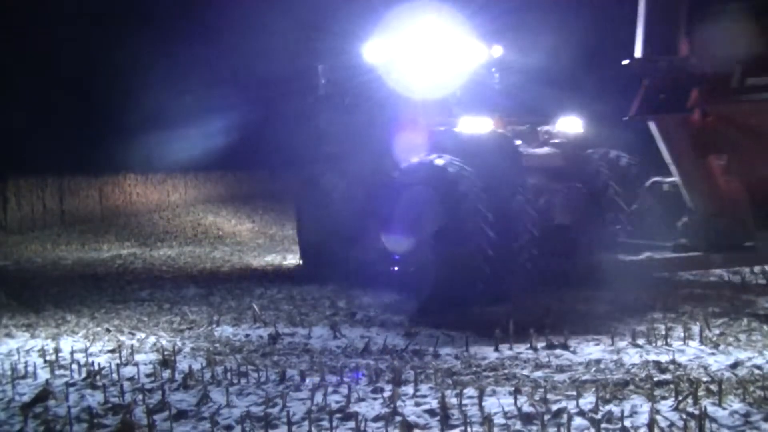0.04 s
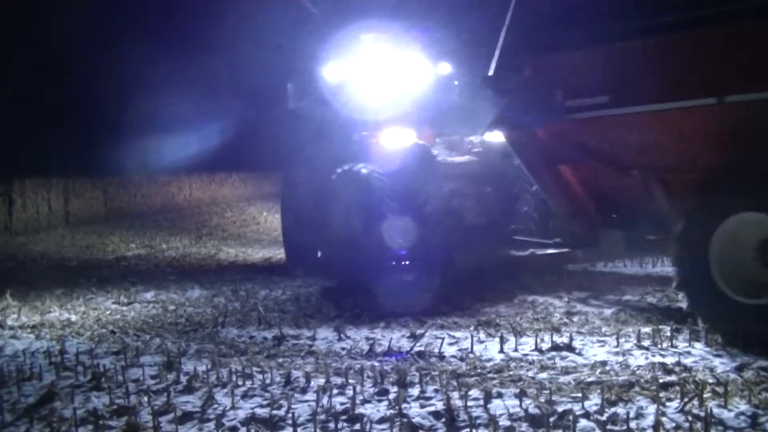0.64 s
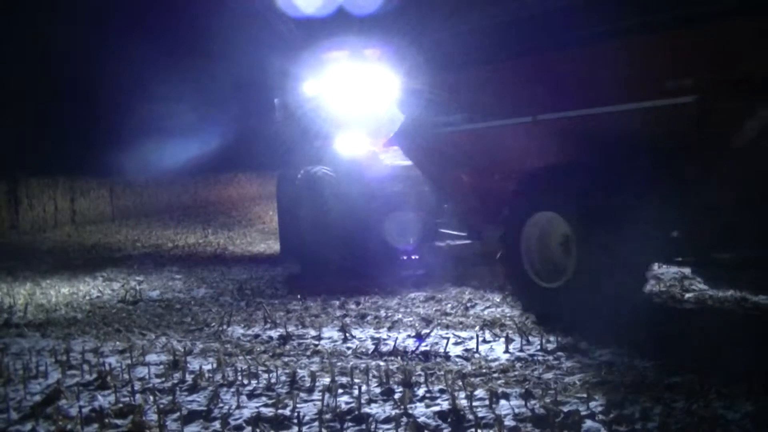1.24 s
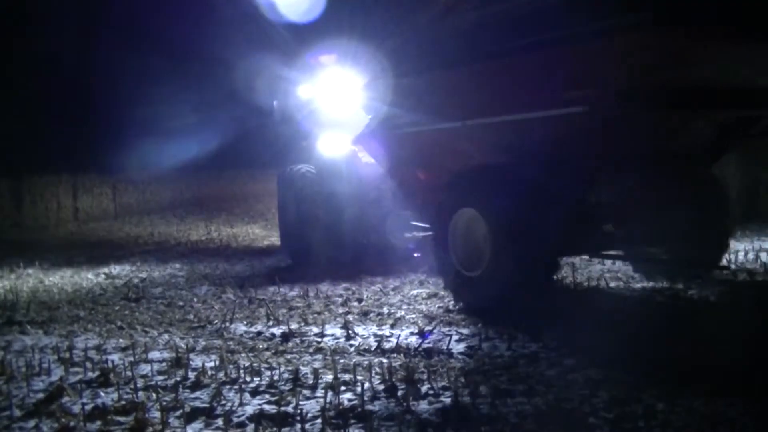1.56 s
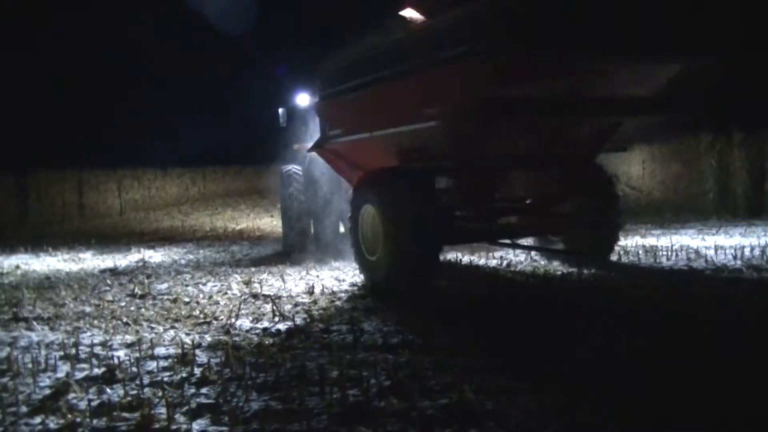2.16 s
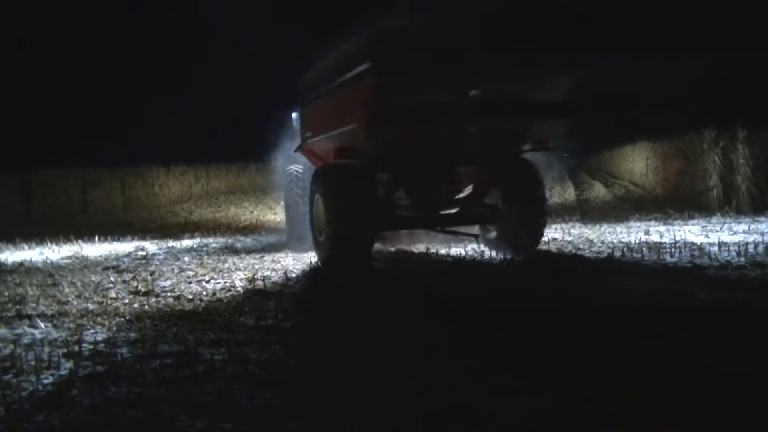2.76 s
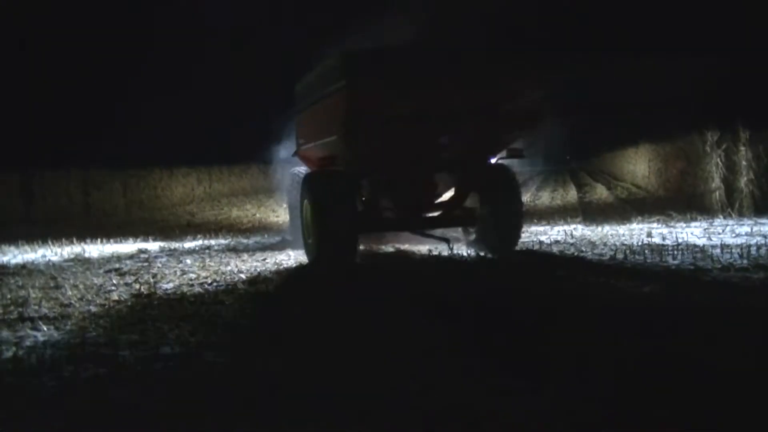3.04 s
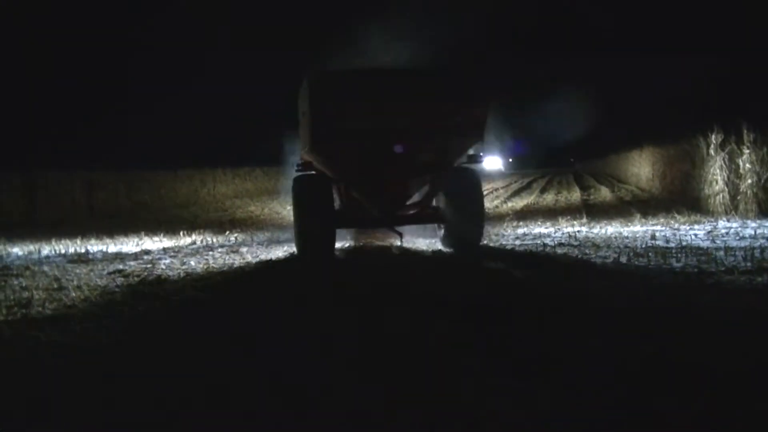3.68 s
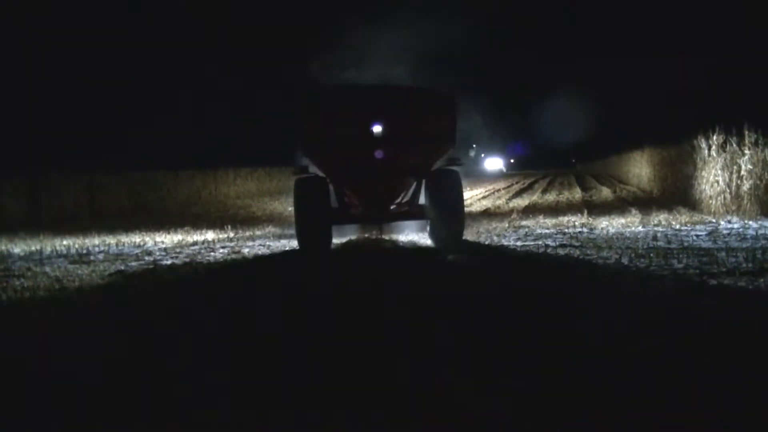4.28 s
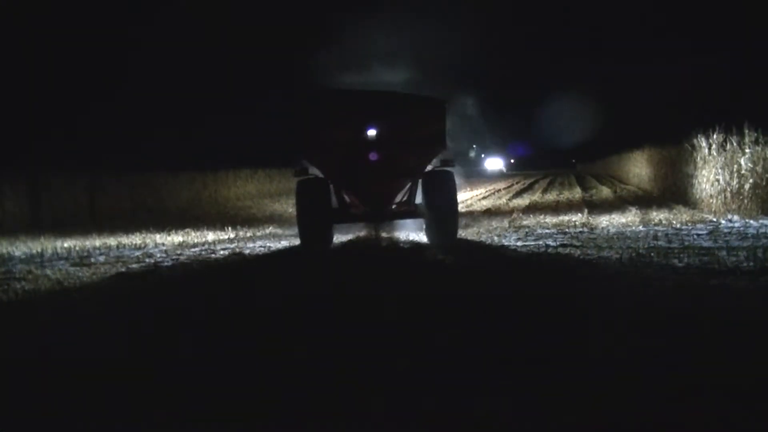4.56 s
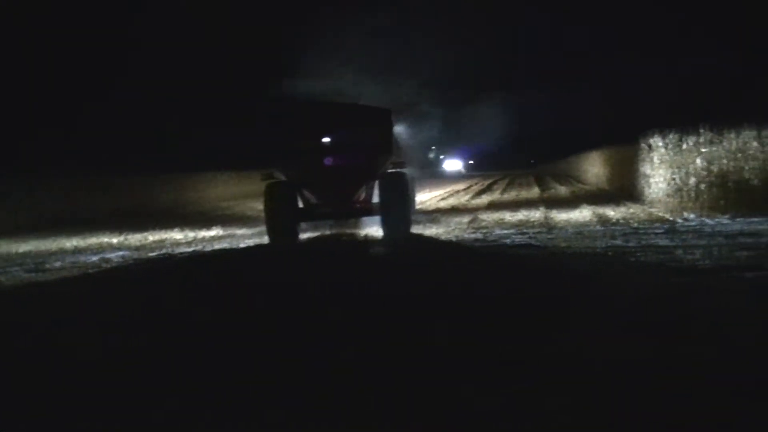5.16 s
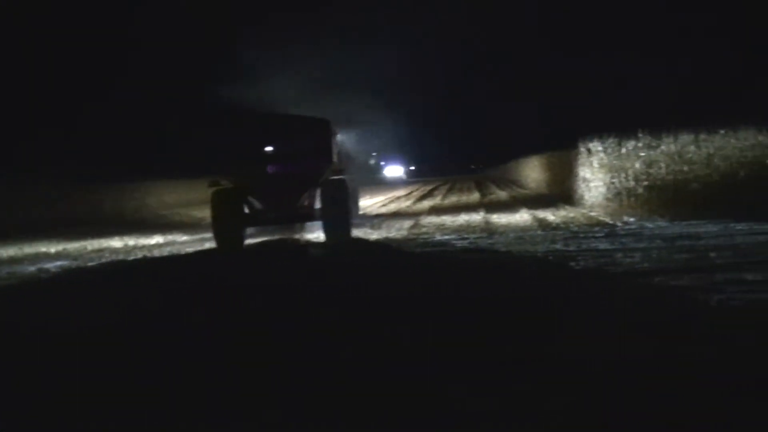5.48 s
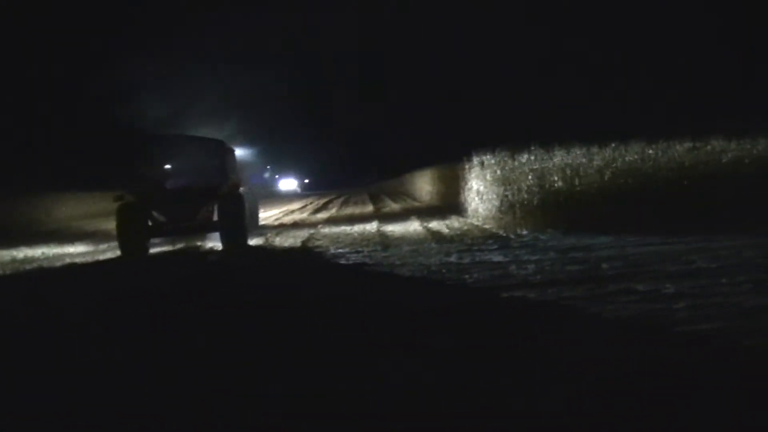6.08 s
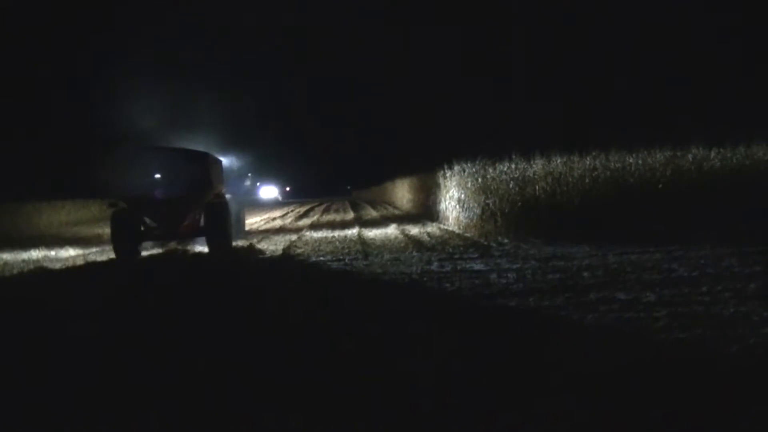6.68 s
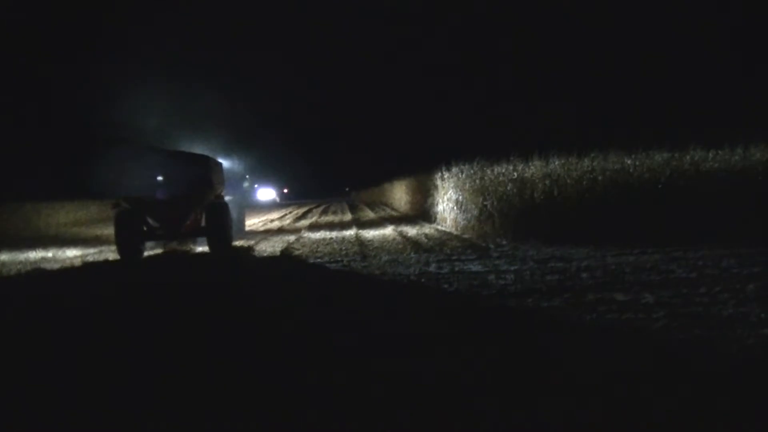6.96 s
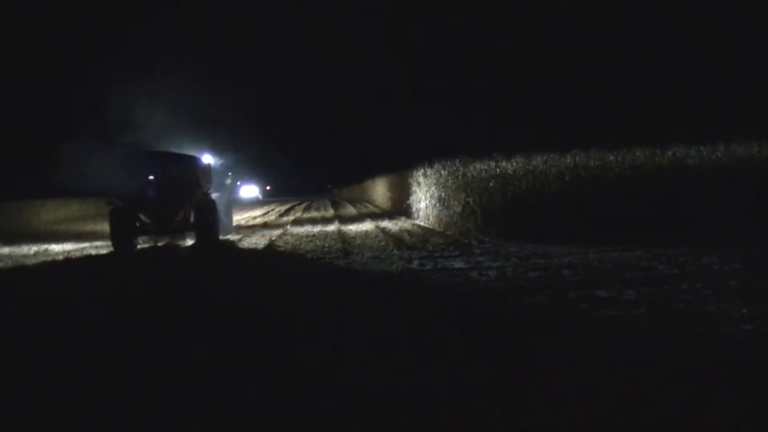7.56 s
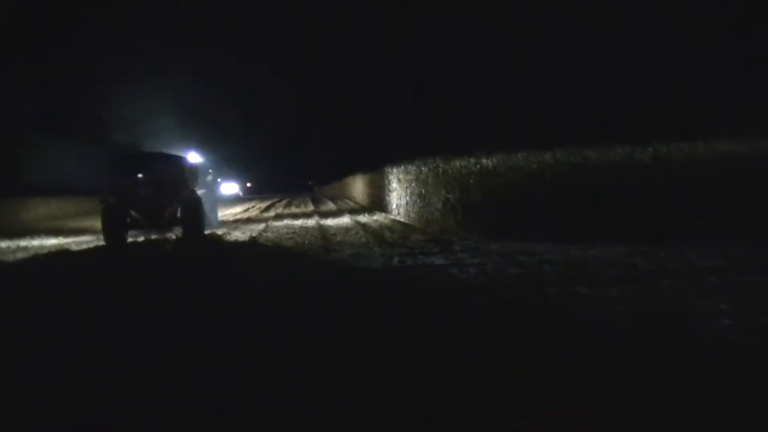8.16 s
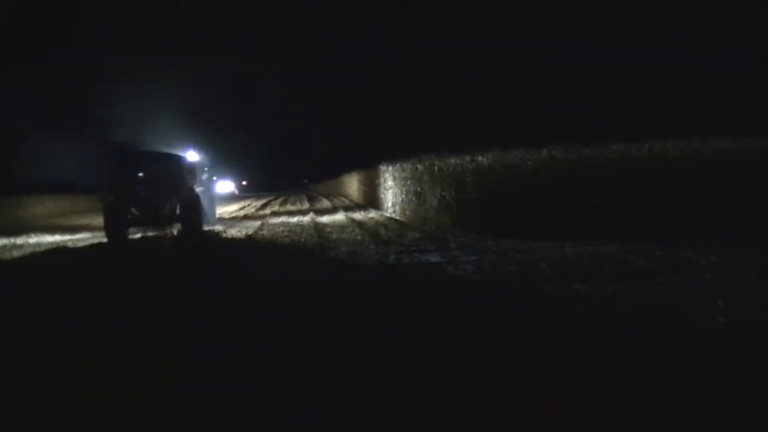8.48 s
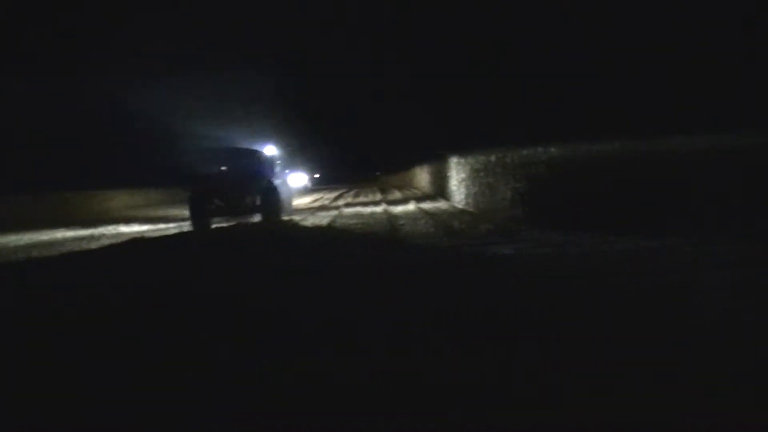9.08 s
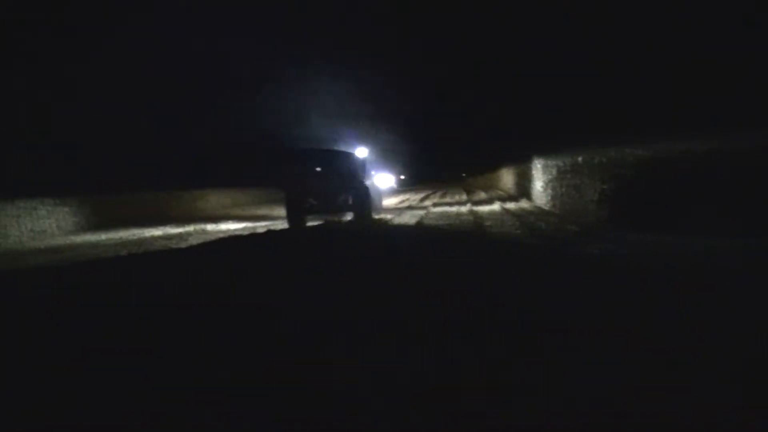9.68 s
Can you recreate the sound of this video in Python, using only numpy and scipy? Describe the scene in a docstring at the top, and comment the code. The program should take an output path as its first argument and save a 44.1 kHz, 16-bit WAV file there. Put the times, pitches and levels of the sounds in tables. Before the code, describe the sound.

A tractor tows a rattling cart close by over dry, crackling corn stubble, then fades away across an open field.

```python
"""A tractor tows a grain cart past, a few metres away, crushing the maize stubble of a frozen field.
Dry stalks crackle and snap under the wheels, the tyres rumble, and ruts rattle the cart's steel box.
The diesel pulses and whines, then fades as it drives off; a loose hitch part knocks once.
Close by, a small metal part pings and cloth brushes twice. A far harvester hums under a soft hiss."""
import sys
import numpy as np
from scipy import signal
from scipy.fft import rfft, irfft, next_fast_len
from scipy.io import wavfile
from scipy.ndimage import uniform_filter1d

SR = 44100
rng = np.random.default_rng(int(sys.argv[2]) if len(sys.argv) > 2 else 0)


def wav_out(sig):
    """Save sig, one row per channel (or a flat mono array), as 16-bit PCM at SR to the path in sys.argv[1]."""
    wavfile.write(sys.argv[1], SR, np.round(np.clip(np.atleast_2d(sig).T, -1, 1) * 32767).astype(np.int16))


N = 437913
T = np.arange(N) / SR
FREQS = np.arange(N // 2 + 1) * SR / N

# In these tables, "decay" is the time a sound takes to fall by 60 dB.
# how wide the stereo sound is: (frequency [Hz], side minus middle [dB])
STEREO_WIDTH = [(60, -19), (250, -10.5), (600, -19.5), (1800, -20.5), (2800, -11.5), (3800, -18.5),
                (4900, -17.5), (5700, -3), (6800, -4.5), (8000, -10), (10500, -1.5), (15000, -8.5)]
# how the microphone's two openings differ in tone: (frequency [Hz], left minus right [dB])
MIC_BALANCE = [(60, -2), (700, -3), (1400, -0.9), (3000, 0.5), (3350, -5.5), (4800, -2), (5350, -5),
               (6050, 5), (6850, -2), (7400, 4), (8600, -2), (9500, -7), (11000, -2.5), (15000, 1)]
# how far the left opening runs ahead: (frequency [Hz], phase lead [radians])
MIC_LEAD = [(2000, 0), (3100, -.3), (4250, .35), (5100, 0), (5600, .9), (6400, -.3), (8200, -.4),
            (9000, -1), (10100, .5), (12000, .3), (13000, 2), (15000, 2.2)]
# the tone of the background hiss: (frequency [Hz], relative level [dB])
HISS_TONE = [(120, -1), (200, -2), (300, -4), (450, -2), (600, 0), (1200, 0), (1800, -1.5), (2300, -3),
             (3000, -2), (3550, 2), (4100, -3), (4800, 5), (5700, -4), (6850, -10.5), (7950, -17),
             (9500, -14), (11000, -19.5), (15500, -21.5)]
# a thin, high sizzle: (time [s], level [dB])
SIZZLE_LEVELS = [(0, -63), (5.9, -52), (9.93, -59.5)]
# the harvester's hum at 1, 2, 3... times its shaft speed: (level [dB])
HUM_LEVELS = [-77, -66, -68, -74, -74.5, -75.5]
# cloth brushes past: (middle time [s], level [dB], half length [s])
CLOTH_BRUSHES = [(8.797, -34.5, .02), (8.85, -49, 0.036), (9.845, -46, 0.0033), (9.894, -34, 0.025)]
# the tone of the cloth: (frequency [Hz], relative level [dB])
CLOTH_TONE = [(300, -30), (1000, -10), (2500, -13), (3500, -2), (5000, 4), (6800, -5), (8000, -1),
              (10000, -20), (15000, -32)]
# the small metal part's notes: (frequency [Hz], relative level [dB], decay [s])
METAL_NOTES = [(13300, -5, .08), (14430, 0, 0.11), (14460, -3, .08), (14760, -5, .04), (15276, -4, .09)]
# the small metal part is touched: (time [s], level [dB], decay [s])
METAL_TOUCHES = [(.605, -39, 0.026), (.773, -17, .05), (.8, -29, 0.48), (.945, -31, .03), (8.72, -53, .4),
                 (9.875, -48, .3)]
# the hitch part's notes: (frequency [Hz], relative level [dB], decay [s])
HITCH_NOTES = [(1430, 9, 0.05), (1570, 0, .04), (1780, -2, .03), (2100, -2, .025), (2439, 4, .045),
               (3666, -14, .03)]
# the tone of the engine block: (frequency [Hz], relative level [dB])
BLOCK_TONE = [(140, -48), (230, -11), (260, -16), (332, -14), (439, -5.5), (502, -2.5), (709, -8),
              (896, -3.5), (1270, -4.5), (1380, -6.5), (1830, -1.5), (2040, -8.5), (2420, -8.5),
              (3300, -5.5), (4290, -1.5), (7260, -120)]
# where the exhaust pipe rings: (frequency [Hz], width [Hz], relative level [dB])
PIPE_PEAKS = [(563, 69, -4), (621, 17, 0), (885, 350, -6.5), (1230, 290, -7), (2800, 39, -5)]
# gears and fan whine: (starting frequency [Hz], relative level [dB])
WHINE_NOTES = [(288, -63), (337, -58.5), (511, -53.5), (630, -52), (1421, -50.5), (1830, -53),
               (2589, -53.5)]
# the tone of tyres on hard ground: (frequency [Hz], relative level [dB])
RUMBLE_TONE = [(20, -36), (45, -22), (70, -7), (120, 2), (170, 4), (210, -7.5), (260, -1.5), (350, -3.5),
               (600, 2), (1500, -55)]
# the heavy wheels drop into hollows: (middle time [s], level [dB], half length [s])
WHEEL_THUMPS = [(.5, -57, 0.045), (.94, -50, 0.043), (1.18, -51, .11), (1.38, -48, .04), (2.23, -54, .05),
                (2.77, -52.5, .09), (3.15, -54.5, .17), (3.8, -58, 0.35), (4.75, -58, .05),
                (5.28, -55, .04), (6.55, -60, .04)]
# the cart clatters: (time [s], level [dB], rise [s], decay [s]). The quick rows are jolts over ruts; # the row
# at 3.9 s is a soft, slow swell of mid-range sound that lingers as the tractor draws away.
CART_CLATTER = [(.424, -26.5, 0.015, .5), (0.695, -22, .001, 0.78), (.91, -31.5, .025, 0.35),
                (1.08, -39.5, 0.025, 1.5), (1.455, -31.5, 0.028, 0.3), (2.19, -32.5, .035, 0.2),
                (2.628, -32, 0.036, 0.49), (2.785, -36.5, 0.021, 0.29), (3.049, -32.5, 0.043, 0.58),
                (3.2, -37, 0.026, 0.5), (3.305, -37.5, 0.018, 0.44), (3.4, -39.5, .015, 0.55),
                (3.51, -41, 0.022, 0.29), (3.62, -38.5, 0.014, 0.6), (3.751, -38, 0.0085, 0.37),
                (3.9, -46.5, 0.12, 1.9), (4.73, -43, 0.018, .33), (5.265, -47.5, .01, .4),
                (6.7, -50, 0.014, .25), (9.11, -48, .009, .1)]
# the tone of the chattering steel box: (frequency [Hz], relative level [dB])
BOX_TONE = [(90, -29), (200, -23), (300, -20), (430, -8), (620, 0), (740, -1), (1050, -2), (1450, 2.5),
            (1900, 1), (2500, 0), (3500, 5), (6000, -13), (12000, -50)]
# where the box's panels ring: (frequency [Hz], width [Hz], relative level [dB])
PANEL_PEAKS = [(565, 76, -1), (996, 95, 2), (1236, 110, -1), (1700, 140, -4), (2200, 50, -11)]
# where the axle rings: (frequency [Hz], width [Hz], relative level [dB])
AXLE_PEAKS = [(241, 14, 7), (394, 80, -1)]
# the tone of a dry stalk: (frequency [Hz], relative level [dB])
STALK_TONE = [(1350, -24), (2300, -23), (2790, -19.5), (4320, 1), (4790, 2.5), (5030, 1.5), (5710, -14.5),
              (6240, -6), (6810, -21), (7380, -14.5), (9010, -17.5), (10200, -29.5), (11800, -28.5),
              (13100, -31), (15500, -33)]
# single stalks snap: (time [s], base level [dB], splinter gain [dB], treble gain [dB]); # the row at 0.6955 s
# is the sharp crack that opens the cart's jolt at that moment
STALK_SNAPS = [(0.0699, -13.5, -13, 7.5), (.222, -20.5, -10, 6), (.261, -14, -10, 4.5), (.3105, -17, -8, 3),
               (.365, -21.5, -6.5, 10.5), (.654, -16, -8, 5), (.6955, -15.5, -7, -3), (.707, -12, -3.5, -2),
               (.888, -14.5, -7.5, -8), (.9796, -3, -17, -2), (1.038, -12, -10, -9),
               (1.166, -10.5, -6.5, -2), (4.361, -22, -10, -10), (4.9, -26, -2, -4),
               (5.0201, -20, -20, -7.5), (5.151, -24.5, -8, 0), (5.3, -31, -5, -4), (5.45, -31, -8, 0),
               (5.861, -26, -15, 12.5), (6.012, -31.5, -9, 8), (6.172, -28, -9, 12.5), (6.33, -34, -10, 7),
               (6.549, -27, -10.5, -2), (6.675, -35, -8, 6), (6.967, -31.5, -4, -5)]
# the wheels flatten thick stubble: (middle time [s], level [dB], half length [s])
THICK_PATCHES = [(.52, -35, 0.022), (1.1, -26, 0.021), (1.27, -36, 0.033), (1.48, -21, 0.1),
                 (1.78, -20.5, 0.24), (2.28, -22, 0.12), (3.45, -32, 0.11), (3.96, -32.5, 0.066),
                 (4.5, -45, 0.033)]

SPEED_M_S, NEAREST_M = 4.25, 5.86
TRACTOR_PASSES_S, CART_PASSES_S = 0.99, 1.15
TURN_MIDDLE_S, TURN_LENGTH_S = 2.3, 0.42  # the cart turns its back to the listener


def undb(db):
    """Turn decibels into a gain to multiply by."""
    return 10 ** (np.asarray(db) / 20)


def gains(points):
    """Gain at every frequency, drawn through (frequency [Hz], level [dB]) points."""
    hz, db = np.transpose(points)
    return undb(np.interp(np.log(FREQS + 1), np.log(hz), db))


def resonances(peaks):
    """Gain at every frequency for something that rings at (frequency [Hz], width [Hz], level [dB])."""
    return np.sqrt(sum(undb(db) ** 2 / (1 + ((FREQS ** 2 - hz ** 2) / ((FREQS + 1) * width)) ** 2)
                       for hz, width, db in peaks))


def filtered(x, response):
    """Filter a sound with a gain for each frequency in FREQS."""
    size = next_fast_len(N, True)
    bin_hz = np.arange(size // 2 + 1) * SR / size
    return irfft(rfft(x, size) * np.interp(bin_hz, FREQS, response), size)[..., :N]


def voiced(pair, tone, diffuse_db=0):
    """Give two unrelated signals a tone and mix them to stereo; more diffuse sounds are wider."""
    tone = tone / np.sqrt(np.mean(tone ** 2))
    width = np.minimum(gains(STEREO_WIDTH) * undb(diffuse_db), 1)
    mid, side = filtered(pair[0], tone), filtered(pair[1], tone * width)
    return np.array([mid + side, mid - side])


def noise():
    """Two streams of white noise."""
    return rng.standard_normal((2, N))


def wander(rate):
    """A smooth random drift of about 1 either way, with rate new values a second."""
    hold = int(SR / rate)
    steps = np.repeat(rng.standard_normal(N // hold + 1), hold)
    return 1.31 * uniform_filter1d(uniform_filter1d(steps, hold), hold)[:N]


def grains(rate, scatter_db):
    """Two streams of random clicks of unequal size, about rate a second, with an average power of 1."""
    size = undb(scatter_db * np.clip(noise(), -2, 2)) * rng.choice([-1, 1], (2, N))
    clicks = size * (rng.random((2, N)) < rate / SR)
    return clicks / clicks.std()


def burst(start, rise, decay):
    """A loudness shape that climbs for rise seconds and dies away."""
    out = np.zeros(N)
    span = slice(int(start * SR), int((start + rise + decay) * SR))
    age = np.maximum(T[span] - start, 0)
    out[span] = np.minimum(age / rise, 1) * np.exp(-np.log(1000) * np.maximum(age - rise, 0) / decay)
    return out


def swells(table):
    """Rounded rises and falls in loudness from (middle time [s], level [dB], half length [s])."""
    return sum(undb(db) * np.exp(-((T - s) / half) ** 2) for s, db, half in table)


def ramp(middle, length):
    """A change from 0 to 1 that takes length seconds."""
    return np.clip(.5 + (T - middle) / length, 0, 1)


def ring(notes):
    """The fading notes of an object tapped once."""
    t = T[:SR // 2]
    return sum(undb(db) * np.cos(2 * np.pi * hz * t) * np.exp(-np.log(1000) * t / decay)
               for hz, db, decay in notes)


def passing(nearest_s, loss_db_m=0):
    """Gain of a passing source: 1 when nearest, weaker with distance and loss over the ground."""
    metres = np.hypot(NEAREST_M, SPEED_M_S * (T - nearest_s))
    return NEAREST_M / metres * undb(-loss_db_m * (metres - NEAREST_M))


def facing(side_db, rear_db):
    """Gain of a cart part as the cart turns from its side to its back."""
    return undb(side_db + (rear_db - side_db) * ramp(TURN_MIDDLE_S, TURN_LENGTH_S))


def background_hiss(hiss_db=-49):
    """An even hiss, and a thin sizzle that stands out once the tractor is far away."""
    hiss = undb(hiss_db) * voiced(noise(), gains(HISS_TONE), diffuse_db=9)
    sizzle = noise() * undb(np.interp(T, *np.transpose(SIZZLE_LEVELS)))
    return hiss + voiced(sizzle, resonances([(7970, 1500, 0)]) ** 2, diffuse_db=-17)


def harvester(shaft_hz=35.4):
    """A far harvester hums at multiples of its nearly steady shaft speed."""
    angle = 2 * np.pi * np.cumsum(shaft_hz * (1 + .002 * wander(2.59))) / SR
    return np.sqrt(2) * sum(undb(db + wander(5)) * np.sin(k * angle + rng.uniform(0, 2 * np.pi))
                            for k, db in enumerate(HUM_LEVELS, 1))


def cloth():
    """Cloth brushes close by in soft rushes of tiny clicks."""
    return voiced(grains(9000, 1.7) * swells(CLOTH_BRUSHES), gains(CLOTH_TONE))


def metal_part(rise_s=0.004, rasp_db=-3, shaken_db=-17, shaken_half_s=0.06):
    """A small metal part rasps and rings very high when touched or shaken by the cloth."""
    push = sum(undb(db) * burst(s, rise_s, decay) for s, db, decay in METAL_TOUCHES)
    push += swells([(s, db + shaken_db, shaken_half_s) for s, db, _ in CLOTH_BRUSHES])
    ping = ring(METAL_NOTES)
    ping /= np.linalg.norm(ping)
    tinkle = signal.fftconvolve(grains(6000, 1) * push, ping[None], axes=1)[:, :N]
    rasp = voiced(grains(5000, 2) * push * undb(rasp_db), resonances([(14700, 800, 0)]) ** 2)
    return tinkle + rasp


def hitch(knock_s=5.619, tap_db=-38):
    """A loose hitch part gives one dull metal knock."""
    tap = np.zeros(N)
    tap[int(knock_s * SR)] = undb(tap_db)
    return signal.fftconvolve(tap, ring(HITCH_NOTES))[:N]


def exhaust_boom(centre_hz=112, level_db=-69):
    """The low throb of the exhaust carries over the field without fading."""
    return voiced(noise() * undb(level_db), resonances([(centre_hz, 45, 0)]) ** 2, diffuse_db=-4)


def whine(fade_s=1.4, sag_per_s=.012):
    """Gears and fan whine, sag in pitch as they pass, and are lost once the cart hides the tractor."""
    clock = np.cumsum(1 + 0.00496 * wander(25.7) - sag_per_s * np.minimum(T, 2)) / SR
    notes = sum(undb(db - 1.5 + 2 * wander(10.8) + 3.7 * wander(69.8)) * np.sin(2 * np.pi * hz * clock)
                for hz, db in WHINE_NOTES)
    return np.sqrt(2) * notes * np.exp(-(T / fade_s) ** 2)


def diesel(firing_hz=102, knock_depth=0.11, block_db=-36, exhaust_db=-51, clear_s=3.2, ease_s=8.49):
    """Burning fuel makes noise that pulses with each firing, in the engine block and the exhaust."""
    eased = ramp(ease_s, 0.046)  # the driver eases off
    hidden = 1 - ramp(clear_s, 0.8)  # falls to 0 as the exhaust comes into the clear
    firing = 1 + knock_depth * np.cos(2 * np.pi * np.cumsum(firing_hz * (1 + 0.034 * wander(6.9))) / SR)
    block = undb(block_db - 3.5 * eased + 1.3 * wander(12)) * passing(TRACTOR_PASSES_S, loss_db_m=0.2)
    exhaust = undb(exhaust_db - 10 * hidden - 20 * eased + wander(8.3))
    roar = voiced(noise() * firing * block, gains(BLOCK_TONE))
    drone = voiced(noise() * firing * exhaust, resonances(PIPE_PEAKS), diffuse_db=10.5)
    return roar + drone


def tyres(level_db=-53, uneven_db=1.4, tread_hz=12, tread_depth=0.15):
    """The tyres throb as their tread blocks meet the hard ground, and boom in the hollows."""
    load = undb(level_db + uneven_db * wander(7)) * passing(CART_PASSES_S)
    tread = 1 + tread_depth * np.sin(2 * np.pi * np.cumsum(tread_hz * (1 + 0.1012 * wander(1.9))) / SR)
    rumble = voiced(noise() * tread * load, gains(RUMBLE_TONE))
    boom_tone = resonances([(73.6, 49, -1), (123, 93, -0.5)]) ** 2
    return rumble + voiced(noise() * swells(WHEEL_THUMPS), boom_tone)


def stalk_tone():
    """The tone of a dry stalk, too thin to give off bass."""
    return gains(STALK_TONE) * FREQS / np.hypot(FREQS, 900)


def cart(clicks_per_s=3000, scatter_db=2, axle_decay_s=2.0, crunch_db=-0.5):
    """In each clatter the steel box rattles, its panels ring, the axle thuds and stalks crunch."""
    shake = sum(undb(db) * burst(s, rise, decay) for s, db, rise, decay in CART_CLATTER)
    thud = sum(undb(db) * burst(s, rise, axle_decay_s) for s, db, rise, _ in CART_CLATTER)
    thud *= facing(side_db=-20, rear_db=-27.5) * passing(CART_PASSES_S)
    flex = shake * facing(side_db=-9.5, rear_db=1)
    parts = [(shake, gains(BOX_TONE)),
             (shake * undb(crunch_db), stalk_tone()),
             (thud, resonances(AXLE_PEAKS))]
    # the load shifts, so each panel takes a changing share of the shaking
    parts += [(flex * undb(db - 5.5 + 1.8 * wander(10)), resonances([(hz, width, 0)]))
              for hz, width, db in PANEL_PEAKS]
    return sum(voiced(grains(clicks_per_s, scatter_db) * drive, tone) for drive, tone in parts)


def ring_stalks(cracks, treble, split_hz=6300, wheel_passes_s=1.56, shift=0.059):
    """Cracks ring the stalks, higher as the nearest wheel goes by; treble fills in above split_hz."""
    upper = 1 / (1 + (split_hz / (FREQS + 1)) ** 12)
    cracks = filtered(cracks, 1 - upper)
    tone = stalk_tone()
    # the pitch slides by blending a lowered and a raised copy of the tone
    lowered, raised = (np.interp(FREQS / (1 + step), FREQS, tone) for step in (-shift, shift))
    pitch_ratio = (4467 + 248 * np.exp(-((T - wheel_passes_s) / 0.46) ** 2)) / 4550
    blend = np.clip(.5 + (pitch_ratio - 1) / (2 * shift), 0, 1)
    ringing = voiced(cracks * (1 - blend), lowered) + voiced(cracks * blend, raised)
    return ringing + voiced(filtered(treble, upper), tone)


def thin_stalks(spurts_per_s=40, scatter_db=1.8, level_db=-35, treble_db=3, spurt_s=0.0058):
    """Thin stalks break in short random spurts behind the cart."""
    breaks = np.abs(grains(spurts_per_s, scatter_db)[0])
    spurts = signal.lfilter([1], [1, -np.exp(-1 / (spurt_s * SR))], breaks)  # each break dies away
    reach = undb(level_db) * passing(CART_PASSES_S, loss_db_m=0.5) * ramp(TURN_MIDDLE_S, TURN_LENGTH_S)
    cracks = grains(15000, 1) * spurts / spurts.std() * reach
    return ring_stalks(cracks, cracks * undb(treble_db))


def snapping_stalks(crack_db=-4, crack_decay_s=0.003, splinter_decay_s=0.092):
    """A whole stalk gives way: one sharp crack, then a spray of splinters."""
    level, treble, clicks = 0, 0, grains(15000, 1)
    for s, db, splinter_db, treble_db in STALK_SNAPS:
        crack = undb(db + crack_db) * burst(s, 0.00078, crack_decay_s)
        splinters = undb(db + splinter_db) * burst(s, 0.0017, splinter_decay_s)
        level += crack + splinters
        treble += (crack + splinters) * undb(treble_db)
    return ring_stalks(clicks * level, clicks * treble)


def crushed_stubble(fibres_per_s=7000, level_db=-23.5, rise_db_s=8, full_s=1.32, until_s=2.73):
    """Fibres break in clumps under the wheels: the crackle swells, holds, then fades ever faster."""
    ahead_s, gone_s = np.maximum(full_s - T, 0), np.maximum(T - until_s, 0)
    force = undb(level_db - rise_db_s * ahead_s) * np.exp(-(gone_s / 1.66) ** 2)
    # lumpier and brighter while the wheels are still coming, duller in thick patches
    early, thick = ahead_s / full_s, swells(THICK_PATCHES)
    fibres = grains(fibres_per_s, 0.3) * undb((1.13 + 1.3 * early) * wander(70))
    treble = force * undb(0.84 + 5 * early) + thick * undb(-4)
    return ring_stalks(fibres * (force + thick), fibres * treble)


def scene():
    """Open ground: every sound arrives directly, with no echo."""
    stalks = crushed_stubble() + snapping_stalks() + thin_stalks()
    vehicles = cart() + tyres() + diesel() + whine() + exhaust_boom() + hitch()
    return stalks + vehicles + metal_part() + cloth() + harvester() + background_hiss()


def record(dry, bass_hz=52, top_hz=15850):
    """The microphone's two openings differ in tone and timing; deep bass and the very top are cut."""
    lead = np.interp(FREQS, *np.transpose(MIC_LEAD))
    tilt = np.sqrt(gains(MIC_BALANCE)) * np.exp(.5j * lead)
    heard = np.array([filtered(dry[0], tilt), filtered(dry[1], 1 / tilt)])
    heard = signal.sosfilt(signal.butter(2, bass_hz, "high", fs=SR, output="sos"), heard)
    return signal.sosfilt(signal.ellip(10, .1, 80, top_hz, fs=SR, output="sos"), heard)


dry = scene()
out = record(dry)
wav_out(out)
```